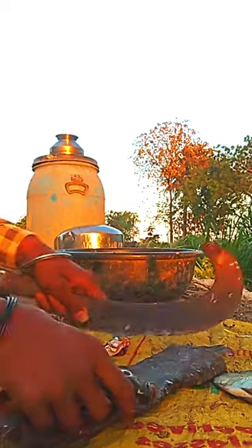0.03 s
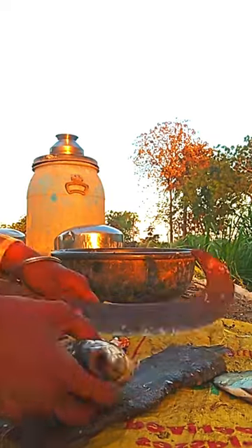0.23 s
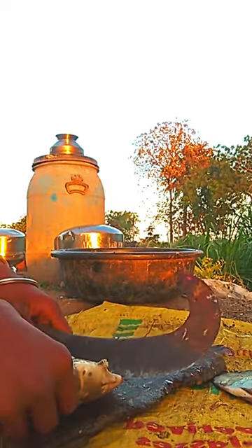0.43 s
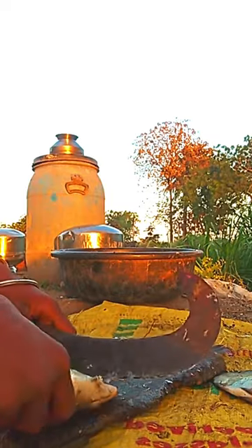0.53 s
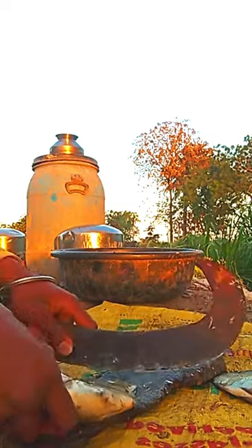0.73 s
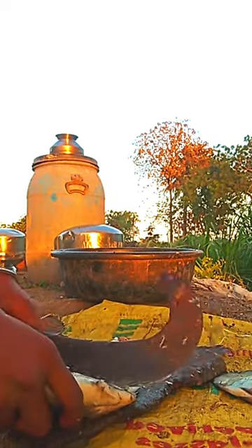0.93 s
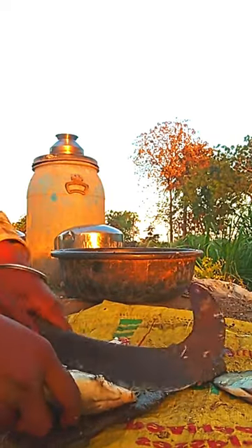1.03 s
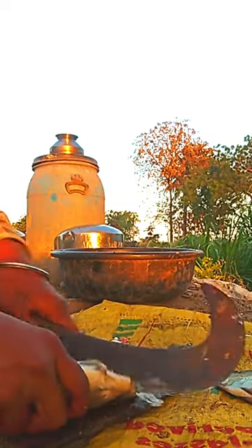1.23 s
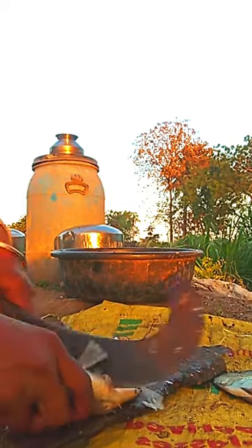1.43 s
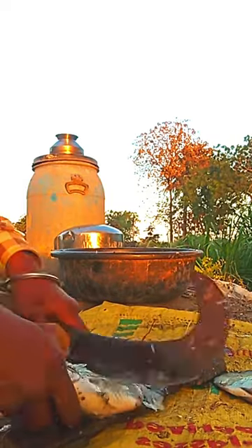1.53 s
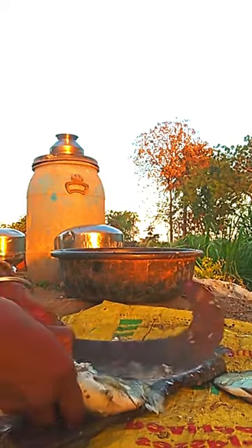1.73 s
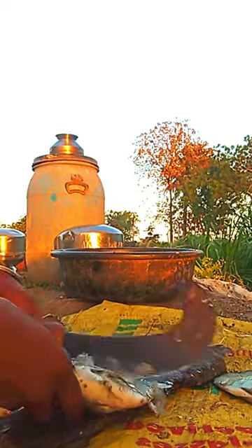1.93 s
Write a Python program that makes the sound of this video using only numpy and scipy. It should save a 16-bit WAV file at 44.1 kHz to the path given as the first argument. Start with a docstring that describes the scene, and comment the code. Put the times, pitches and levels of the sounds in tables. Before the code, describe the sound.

A large blade scrapes scales off a small fish, close by outdoors. It knocks on a slab at the start and harder at about 0.2 seconds. After a few light touches, quick scraping strokes run from 0.9 seconds to around 1.9, strongest between 1.2 and 1.7. Scales crackle and snap, the slab bumps, and the steel faintly rings and squeaks. A faint low hum and thin whine continue behind.

```python
"""Scaling a fish

Outdoors and close by, a large curved blade knocks down on a slab and settles, then scrapes
to and fro over a small fish about six times a second. Scales crackle and snap as the edge
catches them, the slab rumbles under the push, and the steel rings and squeaks faintly.
Behind it all lie a low hum and a thin high whine."""
import sys
import numpy as np
from scipy import signal
from scipy.fft import rfft, irfft, next_fast_len
from scipy.io import wavfile
from scipy.ndimage import uniform_filter1d

SR = 44100
rng = np.random.default_rng(int(sys.argv[2]) if len(sys.argv) > 2 else 0)


def output_pcm(signal):
    """Save a mono or channel-first signal as 16-bit PCM at the path in sys.argv[1].

    Samples are clipped to [-1, 1] before scaling.
    """
    pcm = np.clip(np.atleast_2d(signal).T, -1, 1) * 32767
    wavfile.write(sys.argv[1], SR, np.round(pcm).astype(np.int16))


N = 88200
TIME = np.arange(N) / SR


def from_db(db):
    """Turn decibels into a number to multiply by."""
    return 10 ** (np.asarray(db) / 20)


def rms_one(x):
    """Scale a sound so its average power is 1."""
    return x / np.sqrt(np.mean(x ** 2) + 1e-20)


def pan(db):
    """Share a sound between the ears: plus is left, minus is right."""
    return rms_one(from_db([[db / 2], [-db / 2]]))


def add(track, start_s, sound):
    """Mix a short sound in at its time."""
    first = int(np.clip(start_s * SR, 0, N - 1))
    track[first:first + len(sound)] += sound[:N - first]


def click(start_s, db):
    """A click one sample long."""
    return from_db(db) * (np.arange(N) == max(int(start_s * SR), 0))


def colour(x, tone, size=4096):
    """Make each pitch louder or softer, following a table of pitch_hz, level_db."""
    hz, db = np.transpose(tone)
    grid_hz = np.maximum(np.fft.rfftfreq(size, 1 / SR), 1)
    gains = from_db(np.interp(np.log(grid_hz), np.log(hz), db))
    # fold the filter in time so nothing sounds before its cause
    cepstrum = irfft(np.log(gains))
    cepstrum[1:size // 2] *= 2
    cepstrum[size // 2 + 1:] = 0
    response = irfft(np.exp(rfft(cepstrum)))
    length = next_fast_len(N + size)
    return irfft(rfft(x, length) * rfft(response, length), length)[..., :N]


def ring(x, hz, fade_s):
    """Each click in x starts a note that dies away by 60 dB in fade_s."""
    decay, turn = from_db(-60 / (fade_s * SR)), 2 * np.pi * hz / SR
    return signal.lfilter([0, np.sin(turn)], [1, -2 * decay * np.cos(turn), decay ** 2], x + 1e-18)


def stereo_noise(alike):
    """Hiss; alike (0 to 1) is the share both ears have in common."""
    return np.sqrt(alike) * rng.standard_normal(N) + np.sqrt(1 - alike) * rng.standard_normal((2, N))


def whistle(hz, width_hz, alike):
    """A wavering whistle: hiss narrowed twice around one pitch."""
    fade_s = np.log(1000) / (np.pi * width_hz)
    return rms_one(ring(ring(stereo_noise(alike), hz, fade_s), hz, fade_s))


# Tone of the outdoor hum: pitch_hz, level_db
HUM_TONE = [(25, -31), (60, -5), (105, 0.5), (190, -5.5), (260, -6.5), (500, -11.5), (750, -16),
            (1500, -22.5), (3100, -23.5), (4400, -30), (6700, -28), (8500, -35.5), (13000, -31.5),
            (15500, -32.5)]


def background():
    """A low outdoor hum and a thin, steady whine."""
    hum = from_db(-65.5) * rms_one(colour(stereo_noise(alike=0.31), HUM_TONE))
    whine = from_db(-76) * whistle(hz=6710, width_hz=260, alike=0.24)
    return (hum + whine) * pan(-2)


# Blade and fish hit the slab: start_s, strength_db, brightness_hz
KNOCKS = [(.001, -5.5, 264), (0.012, -22.5, 2370), (.062, -39, 4230), (0.221, 2.5, 6350),
          (0.2247, -2, 2460), (0.2377, -3.5, 460), (.258, -15, 870), (0.294, -37, 2500), (.359, -16, 238),
          (0.91, -13.5, 230), (.927, -33, 2200), (1.182, -15, 1160), (1.214, -15.5, 900),
          (1.4857, -14.5, 1670), (1.514, -25, 3000), (1.567, -14.5, 1010), (1.628, -27.5, 1520),
          (1.756, -48, 1500), (1.874, -20.5, 1190)]
# Notes of the slab with the blade on it: pitch_hz, strength_db, fade_s, pan_db
SLAB_NOTES = [(109.7, -36.5, 0.087, -21), (223.6, -23.5, 0.04, -20), (542, -17, 0.011, -7),
              (890, -19.5, 0.016, -4), (1020, -20, .014, 17), (1218, -23.5, 0.021, -3),
              (1465, -27.5, .012, 0), (1780, -37.5, 0.036, -4), (2257, -23.5, 0.018, -10.5),
              (2500, -23, .012, -10), (3180, -28, 0.011, -13.5), (4860, -39.5, 0.013, -16),
              (6570, -43, 0.023, -8)]
# Tone of crushed grit, also used for breaking scales: pitch_hz, level_db
CRUNCH_TONE = [(700, -7.5), (1500, -10.5), (2000, -3.5), (2600, -1.5), (3500, -3.5), (4500, -12.5),
               (6000, -16), (10000, -29)]
CRUNCH_PAN_DB, FIZZ_PAN_DB = -3.5, 2


def knocks():
    """Each hit makes the slab ring briefly; harder hits crush grit more loudly."""
    force, grit, t = np.zeros(N), np.zeros(N), TIME[:1024]
    grit_fade_s = 0.0025
    for start_s, strength_db, brightness_hz in KNOCKS:
        pulse = t * np.exp(-2 * np.pi * brightness_hz * t)  # shorter sounds brighter
        pulse = from_db(strength_db) * pulse / pulse.sum()
        add(force, start_s, pulse)
        add(grit, start_s, pulse.max() * np.exp(-t / grit_fade_s))
    # the sound follows the slab's speed, so there is no deep bass
    jolt = np.diff(force, prepend=0) * SR / (2 * np.pi)
    slab = sum(from_db(db) * (-1) ** k * ring(jolt / hz, hz, fade_s) * pan(pan_db)
               for k, (hz, db, fade_s, pan_db) in enumerate(SLAB_NOTES))
    crack = colour(grit * stereo_noise(alike=0.8), CRUNCH_TONE)
    return slab + from_db(-18) * crack * pan(CRUNCH_PAN_DB)


def random_clicks(per_s, spread_db):
    """Clicks of uneven size at random times."""
    return (rng.random(N) < per_s / SR) * from_db(spread_db * np.minimum(rng.exponential(1, N), 4))


def even_out(x, even_s):
    """Hold the power near 1 over each stretch of even_s."""
    return x / np.sqrt(uniform_filter1d(np.mean(x ** 2, axis=0), int(even_s * SR) + 1) + 1e-12)


def grains(tone, per_s, spread_db, grain_s, alike, even_s):
    """A stream of tiny breaks, each a short puff of hiss."""
    sizes = random_clicks(per_s, spread_db)
    power = signal.lfilter([1], [1, -np.exp(-2 / (grain_s * SR))], sizes ** 2 + 1e-12)
    return even_out(colour(np.sqrt(power) * stereo_noise(alike), tone), even_s)


def wet_crackle(per_s, spread_db, cycles, even_s, pitch_count=18):
    """Scales flick up one by one, each ringing for a few cycles at its own pitch and place."""
    flicks = random_clicks(per_s, spread_db) * np.sign(rng.standard_normal(N))
    lean = 0.5 * rng.standard_normal(N)  # left or right
    flicks = flicks * np.array([1 + lean, 1 - lean])
    choice = rng.integers(0, pitch_count, N)
    pitches = np.geomspace(900, 7000, pitch_count)
    gains = from_db(np.interp(pitches, *np.transpose(CRUNCH_TONE))) * pitches
    crackle = sum(gains[k] * ring(flicks * (choice == k), hz, cycles / hz)
                  for k, hz in enumerate(pitches))
    return even_out(crackle, even_s)


def pressure(start_s, end_s, level_db):
    """One layer's loudness: each stroke comes in fast, swells, drops and leaves a faint drag."""
    attack_s, release_s, drag_s = 0.0067, 0.0065, 0.095
    swell_db, drag_db = 2, -21
    t = np.linspace(0, N / SR, 1500)[:, None]
    before, after = np.maximum(start_s - t, 0), np.maximum(t - end_s, 0)
    progress = np.clip((t - start_s) / np.maximum(end_s - start_s, 1e-3), 0, 1)
    rise = np.exp(-before / attack_s) * from_db(swell_db * (progress - 1))
    tail = np.exp(-after / release_s) + from_db(drag_db) * np.exp(-after / drag_s)
    return np.interp(TIME, t[:, 0], np.linalg.norm(from_db(level_db) * rise * tail, axis=1))


# Strokes of the blade: start_s, end_s, rumble_db, rasp_db, crunch_db, fizz_db
STROKES = [(.005, 0.067, -66, -69.5, -67, -69), (0.249, 0.275, -46, -49, -61, -73.5),
           (0.278, 0.29, -47, -79, -70, -86), (0.354, 0.368, -57, -67.5, -73.5, -73.5),
           (0.57, 0.584, -63.5, -82, -74, -72), (0.732, .805, -68, -89, -77, -71),
           (0.904, 0.906, -51.5, -62, -57, -60), (0.965, 1.027, -55.5, -62, -56, -54.5),
           (1.007, 1.051, -66, -73, -56, -63.5), (1.063, 1.11, -73, -68.5, -70.5, -67.5),
           (1.12, 1.134, -54, -75, -60, -52.5), (1.163, 1.183, -60, -65.5, -55.5, -56),
           (1.18, 1.194, -39, -54, -48, -49.5), (1.199, 1.22, -49, -50.5, -48.5, -46.5),
           (1.263, 1.287, -55.5, -56.5, -57, -54.5), (1.313, 1.32, -46, -59, -57, -50.5),
           (1.354, 1.374, -49.5, -48, -51, -55.5), (1.379, 1.396, -43.5, -43, -47.5, -44.5),
           (1.425, 1.494, -67, -59, -64.5, -60.5), (1.508, 1.527, -51, -50, -59.5, -70),
           (1.54, 1.564, -46, -54.5, -46.5, -50.5), (1.57, 1.572, -53, -42.5, -44.5, -46),
           (1.614, 1.642, -62, -63, -66.5, -60), (1.664, 1.663, -57.5, -71, -56, -48.5),
           (1.695, 1.716, -54.5, -54, -57.5, -61), (1.722, 1.74, -59, -52, -49, -49),
           (1.74, 1.789, -76, -69, -63, -68.5), (1.86, 1.898, -44, -56.5, -58, -66),
           (1.897, 1.923, -75, -59, -53.5, -57.5)]
# Tones of the slab's low rumble, the middle rasp and the scales' high fizz: pitch_hz, level_db
RUMBLE_TONE = [(30, -20.5), (80, -11), (140, -5), (200, 3), (240, 1.5), (330, -3.5), (450, -22.5),
               (800, -43.5)]
RASP_TONE = [(200, -33), (370, 3), (490, 0.5), (650, -6), (1000, -14.5), (1220, -7.5), (1600, -16),
             (3000, -34)]
FIZZ_TONE = [(2500, -24.5), (4500, 2), (6000, -0.5), (7500, -1.5), (10000, 2), (13000, 1), (15500, -2),
             (18000, -17.5)]


def scraping():
    """The edge catches on scale after scale, shaking the slab and spraying fine crackle."""
    start_s, end_s, *layers_db = np.transpose(STROKES)
    push, rub, bite, spray = [pressure(start_s, end_s, db) for db in layers_db]
    rumble = grains(RUMBLE_TONE, per_s=700, spread_db=0.5, grain_s=0.0012, alike=0.46, even_s=0.012)
    rasp = grains(RASP_TONE, per_s=330, spread_db=-0.5, grain_s=0.0014, alike=0.69, even_s=0.0098)
    crunch = wet_crackle(per_s=3600, spread_db=2.0, cycles=13.4, even_s=0.021)
    fizz = grains(FIZZ_TONE, per_s=1800, spread_db=3.2, grain_s=0.0012, alike=0.15, even_s=0.03)
    return (push * rumble * pan(-10) + rub * rasp * pan(-6)
            + bite * crunch * pan(CRUNCH_PAN_DB) + spray * fizz * pan(FIZZ_PAN_DB))


# Single scales snap off: start_s, level_db, spit_boost_db
SNAPS = [(.0903, -56, 19.5), (0.51, -57.5, 12.5), (.802, -55.5, 13), (0.9033, -51.5, 3),
         (.9752, -35.5, 6.5), (1.0147, -37.5, 11.5), (1.0547, -48, -3), (1.1812, -25.5, -18),
         (1.197, -31, -3), (1.2125, -44, 12), (1.3205, -49.5, 15.5), (1.365, -29, -15), (1.3862, -30, -12),
         (1.3935, -27, -5), (1.474, -49, 17.5), (1.545, -37, 11.5), (1.5667, -24.5, -9), (1.7355, -29, 7.5),
         (1.77, -43, -9), (1.913, -37.5, -4), (1.96, -48, 1)]


def snaps(spit_s=0.001):
    """A scale gives way: a sharp crack with a brief spit of high hiss."""
    cracks = sum(click(start_s, db) for start_s, db, _ in SNAPS)
    crack = colour(cracks, CRUNCH_TONE) / np.abs(colour(click(0, 0), CRUNCH_TONE)).max()
    spits = sum(click(start_s, db + boost_db) for start_s, db, boost_db in SNAPS)
    spit_level = signal.lfilter([1], [1, -np.exp(-1 / (spit_s * SR))], spits + 1e-18)
    spit = colour(spit_level * stereo_noise(alike=0.6), FIZZ_TONE)
    return crack * pan(CRUNCH_PAN_DB) + from_db(-8) * spit * pan(FIZZ_PAN_DB)


# Notes that linger, high ones in the blade and low ones in the fish's hollow body: start_s, pitch_hz, level_db,
# fade_s
RINGS = [(.261, 220, -31.5, .11), (.257, 1270, -53, 0.15), (.2925, 1305, -45.5, 0.035),
         (1.231, 746, -51, .05), (1.418, 738, -47.5, 0.09), (1.41, 2326, -51.5, 0.11),
         (1.559, 489, -28.5, 0.048), (1.585, 2355, -50, 0.064), (1.711, 236.3, -34.5, 0.099),
         (1.756, 778, -45, 0.043), (1.925, 728, -42, 0.043), (1.925, 2320, -53.5, 0.17)]


def ringing():
    """Notes ring on when the edge catches or springs free: the blade high, the fish's hollow body low."""
    notes, t = np.zeros(N), TIME[:N // 4]
    for start_s, hz, db, fade_s in RINGS:
        add(notes, start_s, from_db(db - 60 * t / fade_s) * np.sin(2 * np.pi * hz * t))
    return notes * pan(-9)


# Squeaks of the edge: start_s, length_s, level_db
SQUEAKS = [(0.429, .065, -74), (1.107, 0.032, -55), (1.241, 0.04, -58), (1.435, 0.068, -64),
           (1.61, 0.047, -63.5)]


def squeaks():
    """The edge slips and squeaks thinly on light strokes."""
    slip = np.zeros(N)
    for start_s, length_s, db in SQUEAKS:
        arch = np.abs(np.sin(np.linspace(0, np.pi, int(length_s * SR))))
        add(slip, start_s, from_db(db) * np.sqrt(arch))
    return slip * whistle(hz=3295, width_hz=210, alike=0.5) * pan(-9)


def scene():
    """The work lies a little to the right, so the left ear hears it a touch later."""
    left, right = knocks() + scraping() + snaps() + ringing() + squeaks()
    delay_s = 0.00004
    return np.array([np.roll(left, round(delay_s * SR)), right]) + background()


def record(dry):
    """Cut away the very highest treble."""
    cutoff_hz = 15900
    return signal.sosfilt(signal.ellip(10, 0.2, 70, cutoff_hz, fs=SR, output="sos"), dry)


dry = scene()
out = record(dry)
output_pcm(out)
```